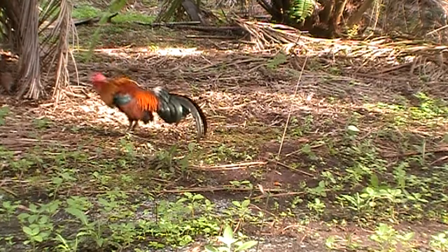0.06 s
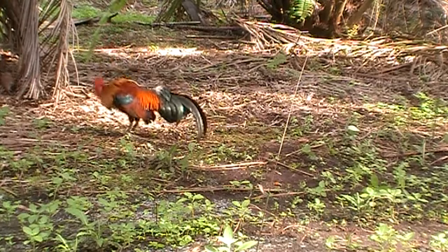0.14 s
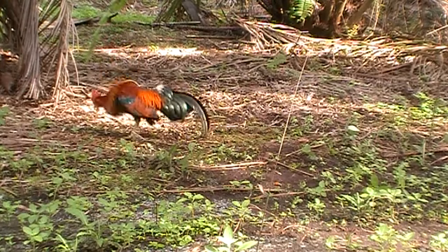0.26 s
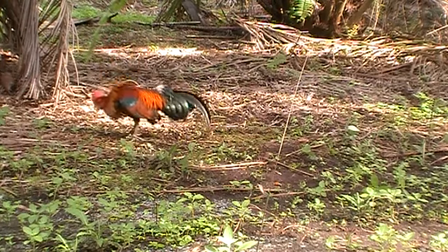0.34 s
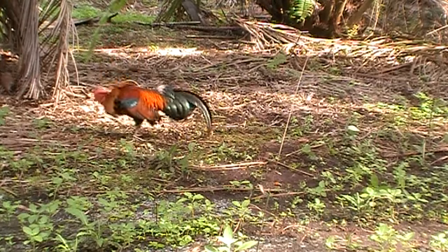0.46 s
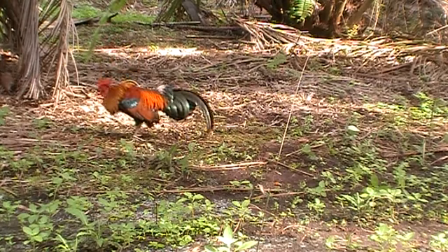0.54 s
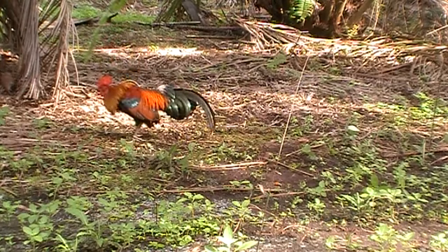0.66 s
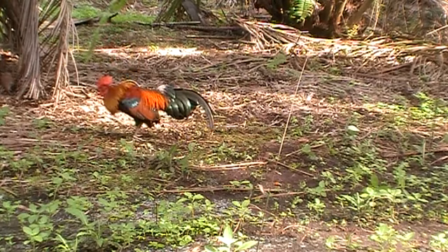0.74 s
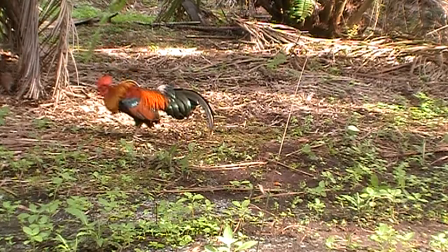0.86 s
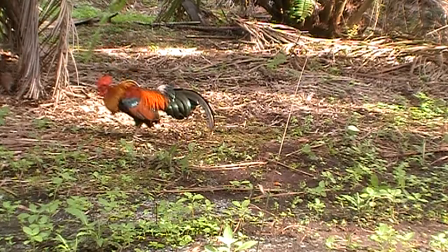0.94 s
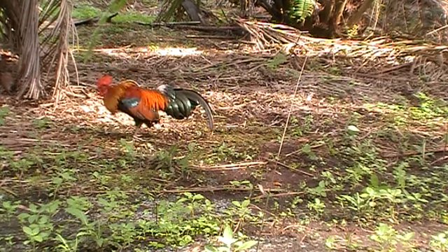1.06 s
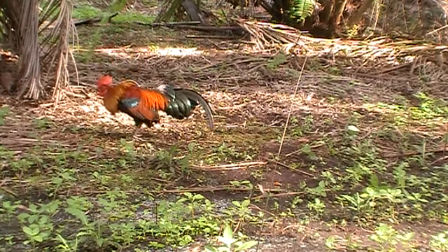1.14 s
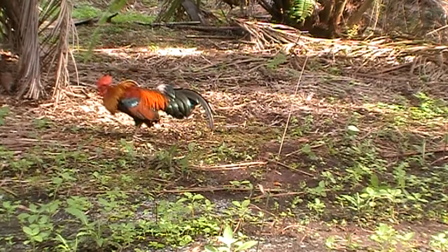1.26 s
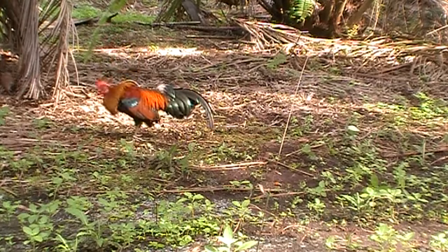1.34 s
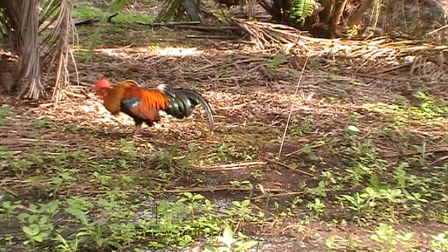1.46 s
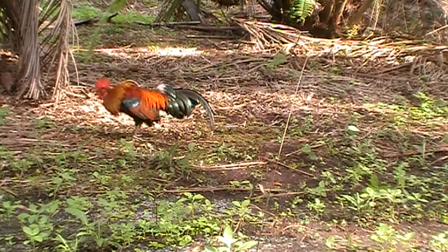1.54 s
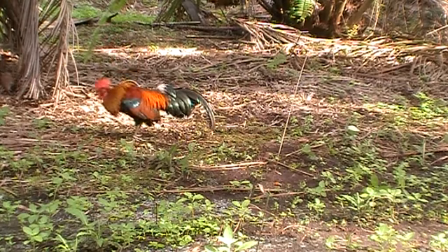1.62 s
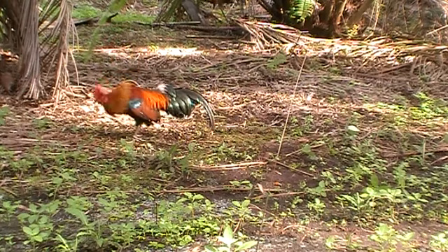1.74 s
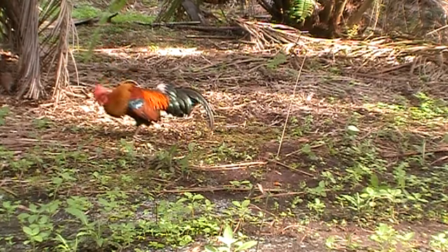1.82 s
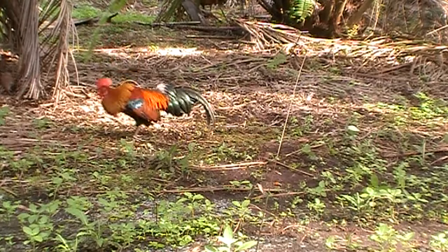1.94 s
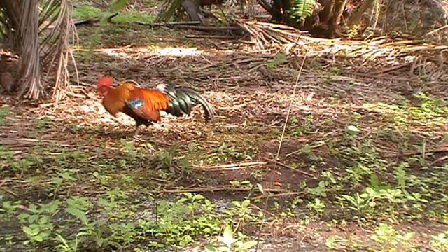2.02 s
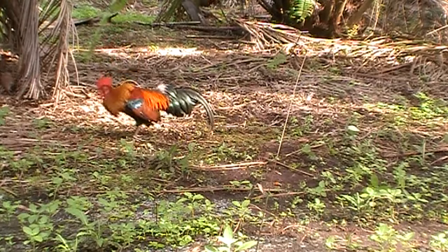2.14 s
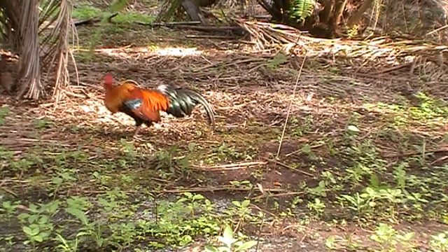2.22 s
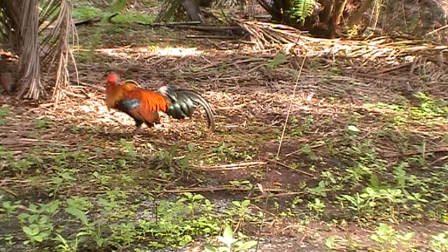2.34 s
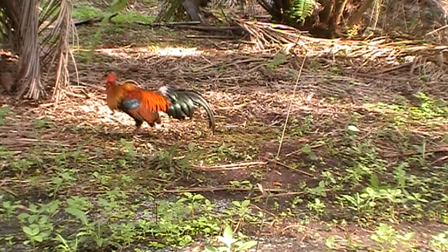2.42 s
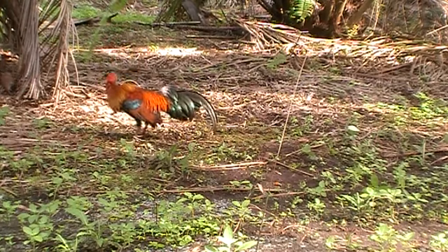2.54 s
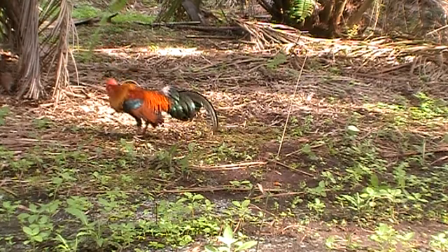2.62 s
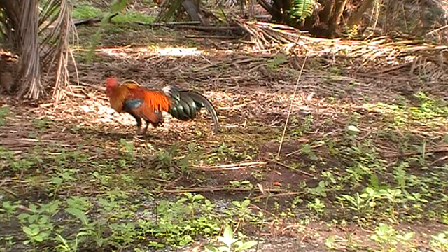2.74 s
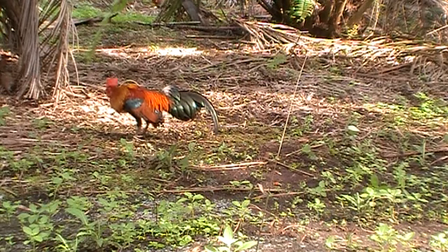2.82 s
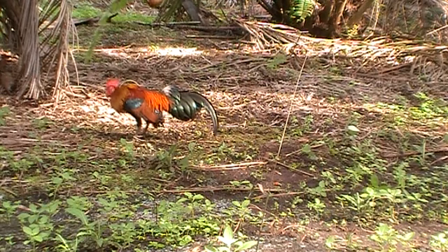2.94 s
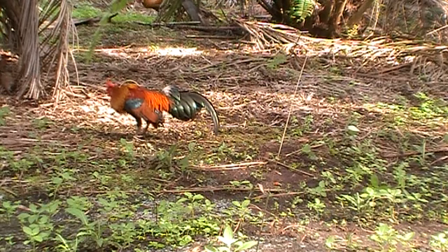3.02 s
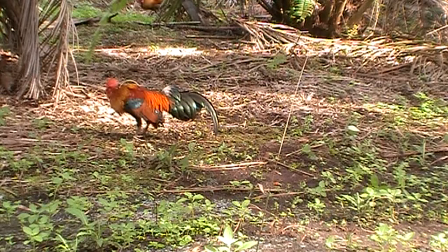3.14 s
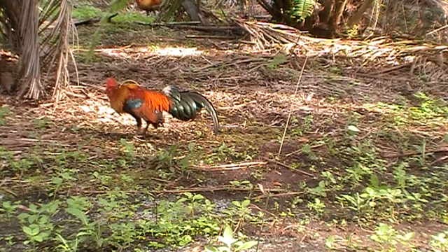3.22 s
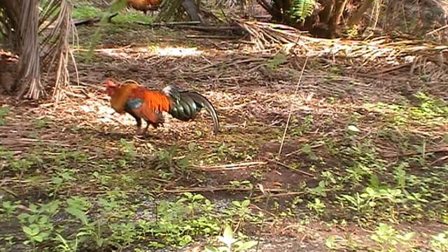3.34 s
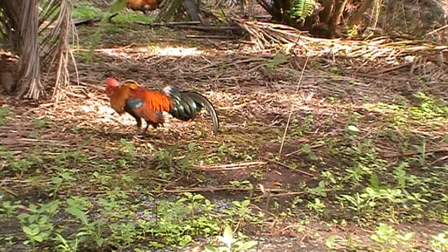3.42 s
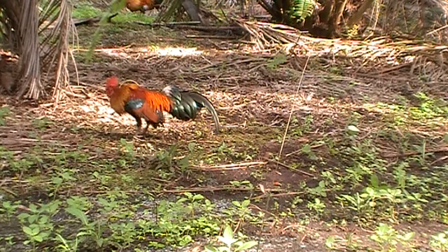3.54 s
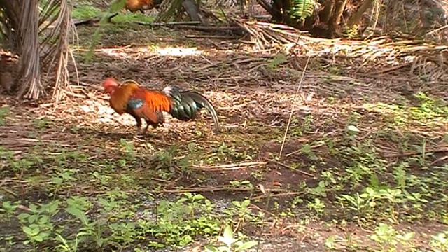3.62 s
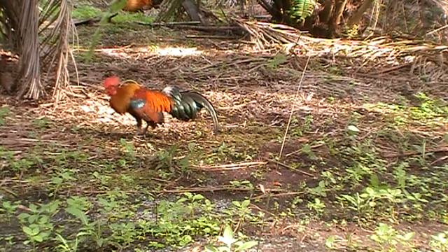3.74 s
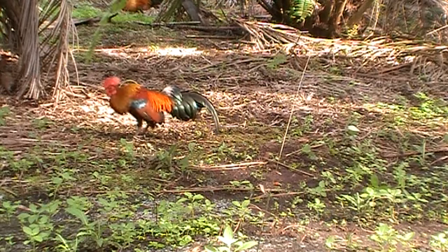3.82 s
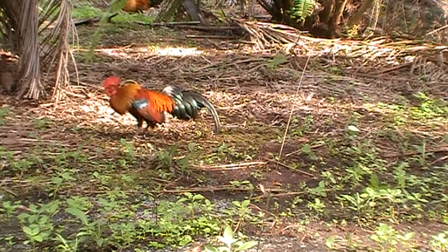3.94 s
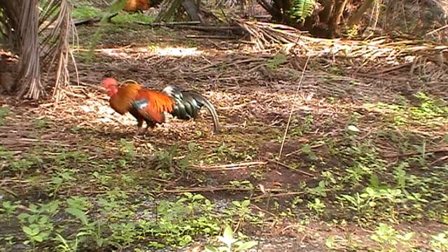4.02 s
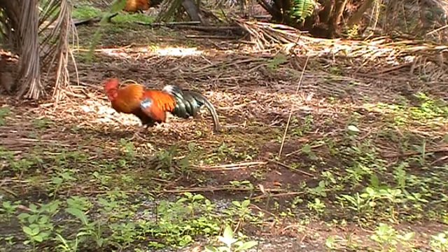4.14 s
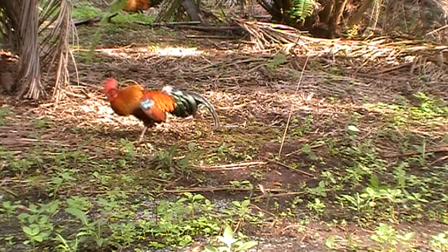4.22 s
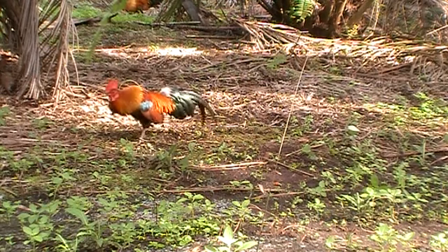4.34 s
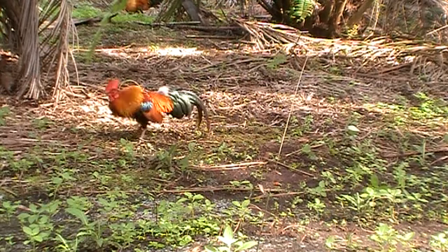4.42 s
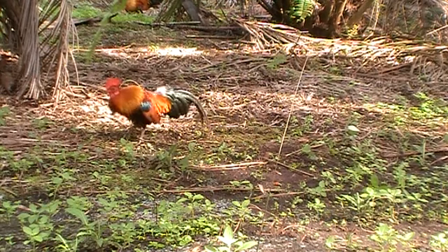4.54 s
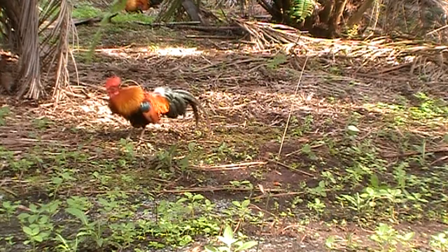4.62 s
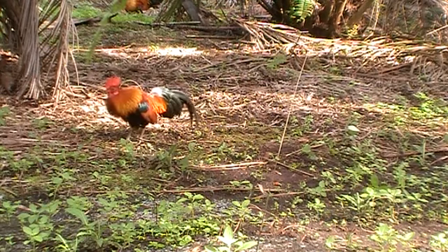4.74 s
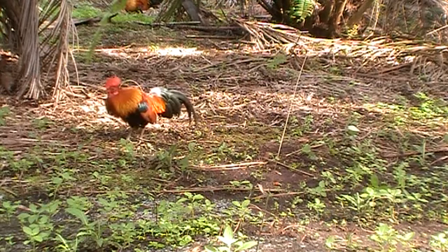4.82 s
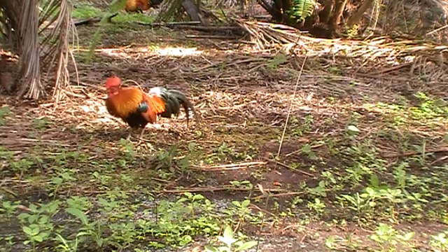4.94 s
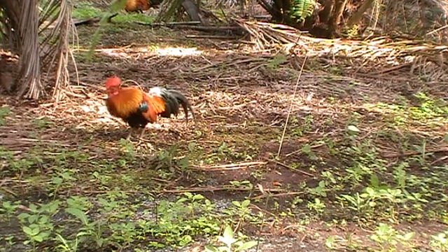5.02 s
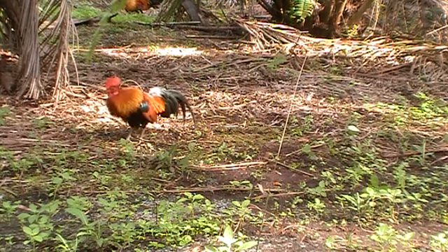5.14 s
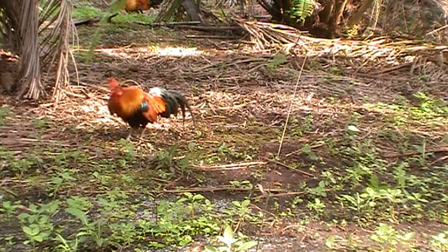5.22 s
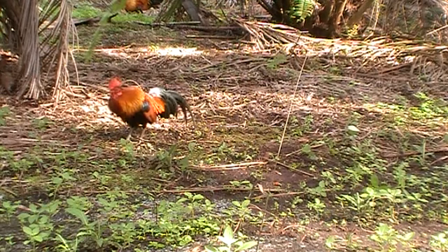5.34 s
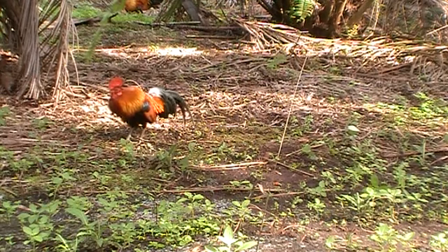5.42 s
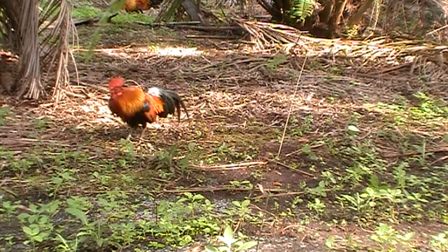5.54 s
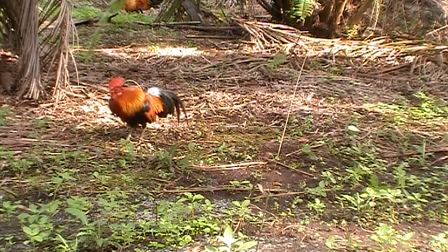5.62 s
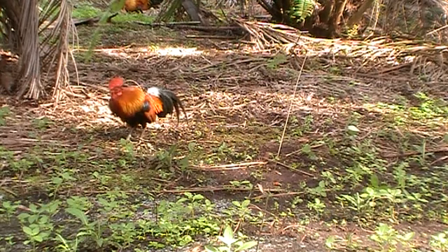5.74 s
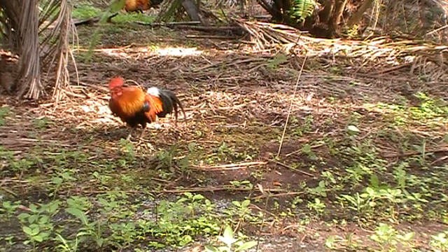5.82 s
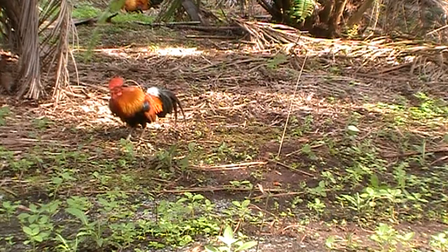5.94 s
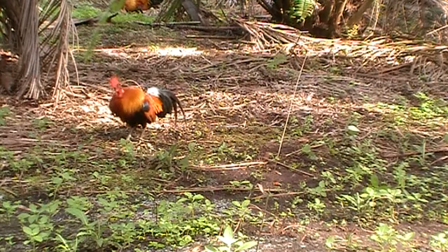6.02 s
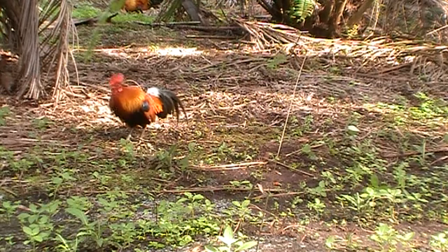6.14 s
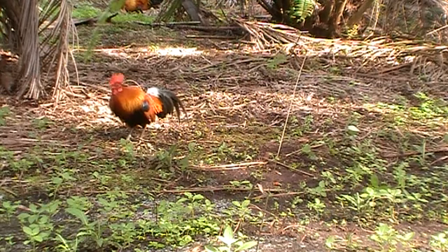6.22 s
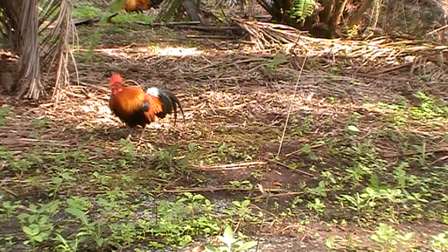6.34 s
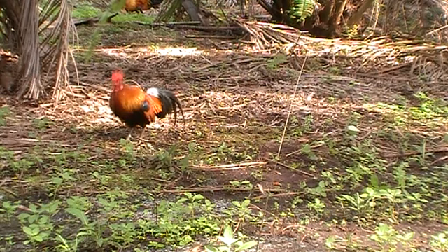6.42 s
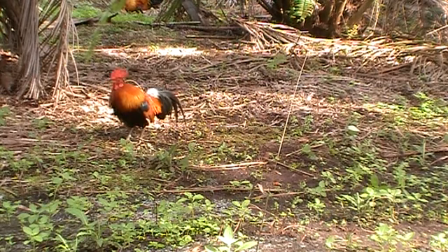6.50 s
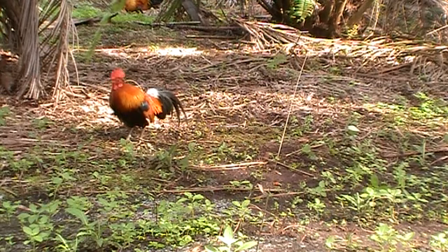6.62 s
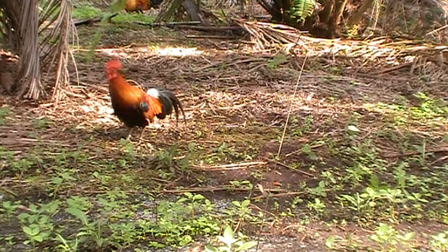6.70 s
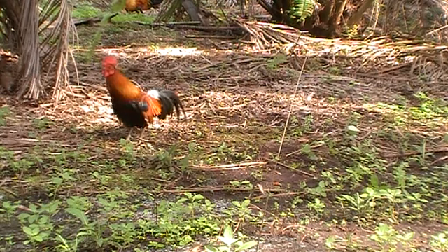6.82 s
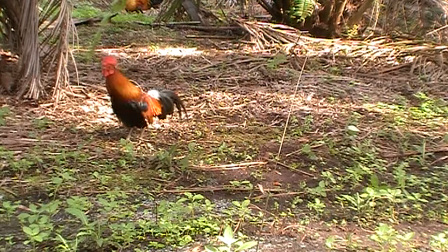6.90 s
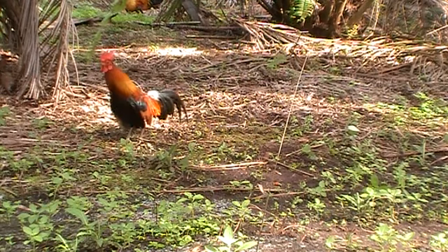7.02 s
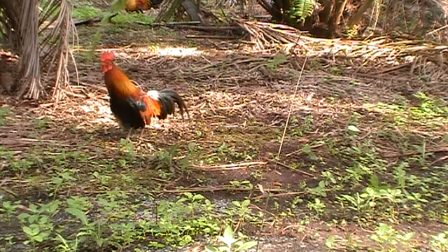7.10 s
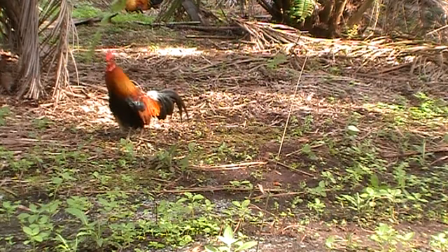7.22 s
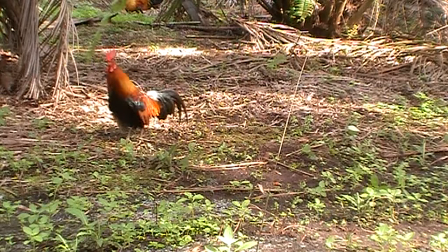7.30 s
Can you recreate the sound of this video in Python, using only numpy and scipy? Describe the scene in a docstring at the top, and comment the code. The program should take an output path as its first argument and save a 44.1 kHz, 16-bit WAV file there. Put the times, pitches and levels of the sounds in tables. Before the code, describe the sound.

A thin, high, rapidly pulsing cricket and katydid tone hangs over forest hush and faint low rumble. Distant fowl cackle and crow, and a dove repeats a three-note coo whose last note trills, then smooths and falls. Small twigs snap. A rooster mutters softly midway, then gives four abrupt, hoarse alarm clucks near the end, the first by far the loudest. Outdoor stereo pickup, with a short woodland echo.

```python
"""Crickets and katydids keep up a thin, high, pulsing tone over a low distant rumble and a forest hush: wing
strokes are gated tones or noise, the rumble and hush are shaped noise. Far fowl cackle and crow in wavering
notes; hoarse bird calls are sliding noise and twigs snap as tiny noise bursts. A dove repeats a three-note coo,
a near sine whose last note starts as a quickening trill and smooths out as it falls. A rooster mutters softly,
then gives four alarm clucks close by, each weaker than the last: pulses and hoarse air shaped by his throat."""
import sys
import numpy as np
from scipy import signal
from scipy.fft import rfft, irfft, next_fast_len
from scipy.io import wavfile
from scipy.ndimage import uniform_filter1d

SR = 44100
rng = np.random.default_rng(int(sys.argv[2]) if len(sys.argv) > 2 else 0)


def to_wav(s):
    """Save 16-bit WAV."""
    ch = np.atleast_2d(s).T  # columns
    pcm = np.round(np.clip(ch, -1, 1) * 32767)  # PCM
    wavfile.write(sys.argv[1], SR, pcm.astype(np.int16))


N = 325017
T = np.arange(N) / SR   # time in seconds

# How the rooster's throat passes sound with the beak wide open. Each row: frequency in Hz, gain in dB.
OPEN_BEAK = [(250, -43), (480, -25.5), (680, -17), (1000, -5), (1200, 2.5), (1340, 6), (1560, -2),
             (2000, -16), (2380, 1.5), (2720, -9.5), (3500, -19), (4300, -15), (6000, -26.5), (11000, -30),
             (15000, -38)]
# A near tree trunk sends the coo and the alarm clucks back after this delay.
TRUNK_ECHO_S = 0.039


def from_db(db):
    """Turn decibels into a gain."""
    return 10 ** (np.asarray(db) / 20)


def rms_one(x):
    """Scale a sound to an average (rms) level of 1."""
    return x / np.sqrt(np.mean(x ** 2) + 1e-20)


def in_time(rows, t=T):
    """Read the columns of a table at the times t; the first column is time in seconds."""
    s, *columns = np.transpose(rows)
    return [np.interp(t, s, c) for c in columns]


def coloured(x, points):
    """Shape a steady sound by (Hz, dB) points, falling steeply outside them; rms 1."""
    size = next_fast_len(x.shape[-1])
    hz, db = np.transpose(points)
    octave = np.log2(np.fft.rfftfreq(size, 1 / SR) + 1)
    knots = np.log2(hz)
    outside = np.abs(octave - np.clip(octave, knots[0], knots[-1]))
    gain = from_db(np.interp(octave, knots, db) - 90 * outside)   # 90 dB per octave outside
    return rms_one(irfft(rfft(x, size) * gain, size)[..., :x.shape[-1]])


def band(hz, width_hz):
    """(Hz, dB) points of one resonance."""
    edge = 1 + abs(width_hz) / hz / 2
    return [(hz / edge ** 2, -12), (hz / edge, -3), (hz, 0), (hz * edge, -3), (hz * edge ** 2, -12)]


def stereo_noise(points, likeness, size=N):
    """Coloured noise whose two ears are alike by the given amount (1 is identical, 0 unrelated)."""
    mid, side = coloured(rng.standard_normal((2, size)), points)
    likeness = np.clip(likeness, -1, 1)
    return rms_one(np.sqrt(1 + likeness) * mid + np.sqrt(1 - likeness) * np.array([side, -side]))


def drift(per_s, size=N):
    """Wander at random between per_s new values a second, with a spread of about 1."""
    knots = rng.standard_normal(int(size / SR * per_s) + 3)
    return np.interp(np.arange(size) / SR * per_s, np.arange(len(knots)), knots)


def turns(hz):
    """Count the cycles done at a changing rate."""
    return np.cumsum(hz) / SR


def pulses(cycles, sharpness):
    """One smooth pulse in the middle of each cycle."""
    return (np.sin(np.pi * cycles) ** 2) ** abs(sharpness)


def panned(x, left_db):
    """Make the left ear louder than the right by left_db."""
    return x * from_db([[left_db / 2], [-left_db / 2]])


def placed(x, left_db, lead_ms):
    """Place a point source: a level difference, and a right ear that hears it lead_ms later."""
    right = np.interp(T - lead_ms / 1000, T, x)
    return panned(np.array([x, right]), left_db)


def add(out, s, sound):
    """Mix a sound in from time s."""
    at = max(round(s * SR), 0)
    out[..., at:at + sound.shape[-1]] += sound[..., :max(N - at, 0)]


def forest(x, t60, dull_hz):
    """Trunks and leaves scatter sound into a dull tail, different in each ear, that drops 60 dB in t60 seconds."""
    t = T[:SR]
    tail = rng.standard_normal((2, SR)) * from_db(-60 * t / t60) * (1 - np.exp(-t / 0.0039))
    tail = tail / np.sqrt(np.sum(tail ** 2) / 2)
    dulling = signal.butter(1, min(dull_hz, SR / 3), fs=SR, output="sos")
    tail = signal.sosfilt(dulling, tail)
    return signal.fftconvolve(x[None], tail, axes=1)[:, :N]


def trunk_echo(x, db):
    """Add one echo, as a near trunk returns the sound."""
    return x + from_db(db) * np.interp(T - TRUNK_ECHO_S, T, x)


def ambience():
    """Distant rumble, alike in both ears only at the bottom, and the even hush of the forest."""
    # Colours of the deep rumble, upper rumble and hush. Each row: frequency in Hz, density in dB per Hz.
    deep_colour = [(13, -49), (22, -0.5), (32, -17), (59, 2.5), (125, -1), (160, -52), (280, -120)]
    upper_colour = [(115, -17), (135, -1.5), (200, -1), (240, -12.5), (330, -28.5)]
    hush_colour = [(200, 3), (400, 2), (1000, -6.5), (2000, -9), (3000, -9), (3900, -10), (4600, -1),
                   (5700, -1), (6200, 0.5), (8300, -0.5), (10000, 3.5), (11600, 4), (12400, -58),
                   (15000, -56)]
    deep = stereo_noise(deep_colour, likeness=0.81) * from_db(-56.33)
    upper = stereo_noise(upper_colour, likeness=0.056) * from_db(-58.27)
    hush = stereo_noise(hush_colour, likeness=0.011) * from_db(-50.5)
    return panned(deep, left_db=-4.0) + panned(upper, left_db=-3.0) + panned(hush, left_db=0.4)


def far_din():
    """Fowl still farther off blur together into a soft wash of noise."""
    # The din's level. Each row: time in seconds, level in dB before the trim.
    din_levels = [(0.0, -64), (4.03, -55.5), (4.16, -53), (4.79, -55.5), (4.94, -55.5), (6.7, -54.5)]
    # The din's colour. Each row: frequency in Hz, density in dB per Hz.
    din_colour = [(800, 5.5), (1100, 2.5), (1500, -2), (2000, -6), (2400, -3), (3200, -14)]
    trim_db = -3
    wash = panned(stereo_noise(din_colour, likeness=0.024), left_db=-2.5)
    return wash * from_db(in_time(din_levels)[0] + trim_db)


def bout(stop, hold, swell_db_per_s, release_db_per_s):
    """Gain of an insect's bout: it swells, holds at 1 and dies away after the stop."""
    swell_db = -swell_db_per_s * np.maximum(stop - hold - T, 0)
    release_db = -release_db_per_s * np.maximum(T - stop, 0)
    return from_db(swell_db + release_db)


def tree_cricket():
    """A faint, narrow band of noise, pulsed by wing strokes, comes and goes as a trill."""
    # The bouts of trilling. Each row: stop in seconds, hold in seconds.
    trill_bouts = [(.55, .6), (3.08, 0.89), (4.588, 0.84), (6.799, 0.82)]
    strokes_per_s = 65.5 + 1.48 * drift(2.06)
    strokes = rms_one(1.0 + pulses(turns(strokes_per_s), sharpness=0.65))
    singing = sum(bout(s, hold, swell_db_per_s=52, release_db_per_s=71) for s, hold in trill_bouts)
    tone = panned(stereo_noise(band(4727, 87), likeness=0.011), left_db=-1.5)
    return tone * strokes * from_db(-61) * singing


def wing_tone(strokes, per_s, hz):
    """Every stroke sets the wing ringing afresh, so the tone splits into lines one stroke rate apart."""
    return np.sqrt(2) * np.sin(2 * np.pi * hz * (strokes % 1) / per_s)


def katydids():
    """One buzzes in bouts of short scrapes; in the other each wing stroke slides down in pitch."""
    # When each bout of the buzzing and of the sliding katydid stops. Each entry: stop in seconds.
    buzz_stops = [.39, 1.16, 1.865, 2.545, 3.235, 3.97, 4.69, 5.41, 6.12, 6.8]
    zip_stops = [.3, 1.35, 2.37, 3.412, 4.47, 5.48, 6.85]
    buzz_rate, zip_rate = 137.3, 91.4   # wing strokes per second
    buzz_db, buzz_rest_db = -50.5, -59   # in a bout; between bouts
    zip_db, zip_rest_db = -56.5, -67

    scrape = turns(buzz_rate + 1.0 * drift(4.5))
    noise = stereo_noise(band(10780, 650), likeness=.9)
    ringing = .66 * wing_tone(scrape, buzz_rate, hz=10790) + .73 * noise
    gate = rms_one(.1 + pulses(scrape, sharpness=3.5))
    buzzing = sum(bout(s, hold=0.3, swell_db_per_s=58, release_db_per_s=700) for s in buzz_stops)
    buzz = ringing * gate * np.hypot(from_db(buzz_db) * buzzing, from_db(buzz_rest_db))

    stroke = turns(zip_rate + 0.4 * drift(4.9))
    slide_hz = 9250 - 1700 * (stroke % 1 - .5) + 260 * drift(3000)
    zip_bouts = [bout(s, hold=0.24, swell_db_per_s=22, release_db_per_s=170) for s in zip_stops]
    zipping = np.max(zip_bouts, axis=0)
    zip_tone = rms_one(np.sin(2 * np.pi * turns(slide_hz)) * pulses(stroke, sharpness=0.24))
    zips = zip_tone * np.hypot(from_db(zip_db) * zipping, from_db(zip_rest_db))
    return panned(buzz, left_db=6.0) + panned(zips, left_db=-0.5)


def bush_cricket():
    """Each rattle is a run of crisp wing strokes on one wavering tone, swelling to a sudden stop."""
    # The rattles. Each row: stop in seconds, level in dB before the trim.
    rattles = [(.26, -54), (0.989, -51), (2.16, -49.5), (2.858, -50), (3.632, -48.5), (4.92, -55),
               (5.52, -49.5), (6.37, -50), (7.08, -47)]
    wing_hz, strokes_per_s, trim_db = 5340, 94, -3
    strokes = pulses(turns(strokes_per_s * (1 + .04 * drift(40))), sharpness=4)
    tone = rms_one(np.sin(2 * np.pi * turns(wing_hz + 70 * drift(500))) * strokes)
    song = tone * sum(from_db(db + trim_db) * bout(s, hold=0.063, swell_db_per_s=174, release_db_per_s=700)
                      for s, db in rattles)
    tail = from_db(-9) * forest(song, t60=0.071, dull_hz=7000)
    return placed(song, left_db=6.0, lead_ms=0.077) + tail


def cricket():
    """About twenty chirps a second, each of four sliding wing strokes, the middle ones strongest."""
    # The chirps slow down, then quicken. Each row: time in seconds, chirps per second.
    chirp_rate = [(0, 20.3), (1, 18.9), (4, 19.4), (7, 21.45)]
    # Colours of the wing's main tone and its overtone. Each row: frequency in Hz, gain in dB.
    song_colour = [(6150, -27), (6300, -21), (6480, -4), (6570, -3.5), (6680, 4.5), (6720, 8.5), (6840, 6),
                   (6915, 7.5), (6985, 2), (7090, 1.5), (7250, 1), (7750, -8), (8200, -17)]
    overtone_colour = [(12600, -10), (13300, -0.5), (13700, -7), (14300, 5), (15200, -26)]
    chirps = turns(in_time(chirp_rate)[0]) + .1   # a tenth of a chirp is already sung at the start
    stroke = 4 * chirps + .03 * drift(70)
    effort = 0.63 + pulses(chirps, sharpness=2.1)
    # each wing stroke slides down through the wing's resonances
    hz = 6990 - 1980 * (stroke % 1 - .5) + 130 * drift(300)
    direct = coloured(np.sin(2 * np.pi * turns(hz)) * pulses(stroke, sharpness=.6) * effort, song_colour)
    # leaves scatter the song, and others sing farther off
    scattered = from_db(-1) * rms_one(forest(direct, t60=.045, dull_hz=9000))
    chorus = from_db(-3.5) * stereo_noise(song_colour, likeness=0)
    song = rms_one(placed(direct, left_db=0, lead_ms=.055) + scattered + chorus)
    overtone = panned(stereo_noise(overtone_colour, likeness=-0.068), left_db=1.4) * from_db(-53)
    return panned(song, left_db=-4.0) * from_db(-42) + overtone * rms_one(3.8 + effort)


def far_birds():
    """Short hoarse calls: bands of noise that slide downwards, blurred by the trees."""
    # The calls. Each row: middle in seconds, length in seconds, start pitch in Hz, end pitch in Hz,
    # width of the noise in Hz, level in dB.
    calls = [(.565, .075, 2160, 1600, 603, -50), (1.665, 0.063, 3350, 2250, 250, -65),
             (3.46, 0.073, 2260, 1560, 450, -60.5), (5.415, .14, 2580, 2100, 900, -57.5),
             (5.874, .09, 2340, 1603, 650, -54), (6.546, 0.089, 2410, 1537, 600, -54.5)]
    out = np.zeros((2, N))
    for s, length, start_hz, end_hz, width, db in calls:
        u = np.linspace(0, 1, int(length * SR))
        hoarse = signal.hilbert(stereo_noise(band(start_hz, width), likeness=0.13, size=len(u)))
        call = np.real(hoarse * np.exp(2j * np.pi * turns((end_hz - start_hz) * u)))   # shift all pitches
        flicker = from_db(db + 5.1 * drift(48, size=len(u)))
        add(out, s - length / 2, flicker * pulses(u, sharpness=0.34) * call)
    return out + from_db(-1) * forest(out[0], t60=0.31, dull_hz=4000)


def twigs():
    """Dry leaves and twigs snap underfoot: tiny bursts of noise that die at once; two more such bursts give the
    rooster's first mutters a crisp edge."""
    # The snaps, and the crisp edges of the mutters at 4.006 s and 4.171 s. Each row: start in seconds, centre
    # frequency in Hz, starting level in dB.
    snaps = [(2.318, 2670, -55), (3.585, 10000, -47), (3.595, 1400, -44.5), (3.703, 9500, -45),
             (4.006, 2520, -56), (4.052, 9920, -39), (4.171, 2890, -47), (5.984, 1495, -52)]
    out, t = np.zeros((2, N)), T[:SR // 20]
    for s, hz, db in snaps:
        noise = stereo_noise(band(hz, hz / 2), likeness=0.48, size=len(t))
        add(out, s, from_db(db - 60 * t / 0.068) * noise)
    return out


def far_note(length, hz, arch, fall, rough, lift_db):
    """An arched, wavering note of which distance leaves mainly the second harmonic."""
    # What is left of the harmonics, from the fundamental up. Each entry: level in dB, before lift_db
    # is added from the third on.
    harmonic_levels = [-27, 0, -15, -13, -28]
    u = np.linspace(0, 1, int(length * SR))
    waver = rough * (.022 * drift(35, size=SR) + .035 * drift(400, size=SR))[:len(u)]
    pitch = hz * (1 - arch * (2 * u - 1) ** 2 - fall * (u - .5)) * (1 + waver)
    phase = 2 * np.pi * turns(pitch)
    note = sum(from_db(level + lift_db * (k > 2)) * np.sin(k * phase)
               for k, level in enumerate(harmonic_levels, 1))
    flicker = from_db(3 * drift(40, size=SR)[:len(u)])
    return rms_one(note) * flicker * pulses(u, sharpness=.2)


def far_fowl():
    """Short clear cackles that fall in pitch, and hoarser crowing from deeper among the trees."""
    # The cackles. Each row: start in seconds, level in dB.
    cackle_rows = [(0.181, -58.5), (0.262, -54), (.355, -60), (.472, -64), (1.173, -59), (1.252, -54),
                   (1.349, -60), (1.463, -63), (2.273, -53), (2.369, -61), (5.707, -48), (6.751, -51)]
    # Drawn-out crowing notes. Each row: start in seconds, length in seconds, pitch in Hz, arch as a share
    # of the pitch, level in dB, roughness (scales the waver), lift of the overtones in dB.
    crow_rows = [(.38, 0.19, 589, 0.087, -65, 0.9, 3), (.62, 0.15, 607, 0.096, -63, 0.68, -3),
                 (.73, 0.16, 547, 0.062, -64, 1, 2), (0.989, 0.072, 610, 0.14, -64, 0.27, -8),
                 (3.221, .33, 600, 0.098, -63.5, 1, 0), (3.454, 0.33, 510.6, .03, -61, 1.23, 4),
                 (4.324, 0.24, 469, 0.011, -59.5, .35, 12), (4.545, 0.39, 462, 0.019, -51, .7, 5),
                 (4.934, 0.128, 517, 0.069, -54.5, 1.03, 4), (5.082, 0.135, 507, 0.071, -57.5, 0.97, -2),
                 (5.198, .41, 503, 0.082, -53.5, 0.72, 4), (5.246, 0.4, 454, 0.029, -55, 1.01, 3),
                 (6.171, .12, 617, 0.046, -66, .5, -4)]
    cackles, crows = np.zeros((2, N))
    for s, db in cackle_rows:
        note = far_note(0.034, 494.4, arch=0, fall=0.14, rough=0.24, lift_db=-2)
        add(cackles, s, from_db(db) * note)
    for s, length, hz, arch, db, rough, lift_db in crow_rows:
        add(crows, s, from_db(db) * far_note(length, hz, arch, 0.0225, rough, lift_db))
    direct = placed(cackles + crows, left_db=-5.5, lead_ms=0.2)
    return direct + from_db(-1) * forest(crows + from_db(-7) * cackles, t60=.5, dull_hz=3050)


def coo_note(top_s, rise, fall, start_hz, top_hz, end_hz, db, trill, smooth_s):
    """Times, pitch, gain and trill depth of one note: two straight glides joined by a rounded top."""
    rounding_s, edge_s, swell_s, trill_fade_s = 0.0261, 0.003, 0.076, 0.08
    droop_hz, droop_s = 60, .022   # the pitch sinks as a note runs out
    crop_hz, loss_db_per_hz = 587.4, 0.27   # a coo fades as its pitch falls below the crop's resonance
    t = np.arange(top_s - rise, top_s + fall, 1 / SR)
    bend = lambda s: np.hypot(s, rounding_s) - rounding_s
    slope = np.where(t < top_s, (top_hz - start_hz) / bend(rise), (top_hz - end_hz) / bend(fall))
    hz = top_hz - bend(t - top_s) * slope
    hz = hz - droop_hz * np.exp((t - t[-1]) / droop_s)
    edges = np.minimum(np.minimum(t - t[0], t[-1] - t) / edge_s, 1)
    swell = np.minimum(0.54 + (t - t[0]) / swell_s, 1)
    gain = edges * swell * from_db(db - loss_db_per_hz * np.maximum(crop_hz - hz, 0))
    depth = np.clip(trill, 0, 1) * np.clip((smooth_s - t) / trill_fade_s, 0, 1)
    return t, hz, gain, depth


def dove():
    """A near sine from the swollen crop; where it trills, it is chopped into pulses that each slide upwards."""
    # How much later each repeat of the coo comes. Each entry: delay in seconds.
    delays_s = [0, 2.109, 4.226]
    # The trill quickens as the last note starts. Each row: time in seconds, pulses per second.
    trill_rate = [(2.046, 28.3), (2.5, 89.6)]
    # The three notes, each an arch of pitch. Each row: top in seconds, rise in seconds, fall in seconds,
    # start pitch in Hz, top pitch in Hz, end pitch in Hz before the droop, level in dB, trill depth 0-1,
    # time in seconds when the trill has smoothed out, octave level in dB at 560 Hz and above.
    notes = [(1.54, 0.06, 0.044, 466, 601.5, 510, -42, 0.05, 1.6, -16),
             (1.866, 0.17, 0.0326, 478, 651, 560, -41.5, .7, 1.89, -30),
             (2.122, .069, .41, 620, 750, 508, -38, 0.95, 2.37, -32)]
    out, trill_start = np.zeros(N), trill_rate[0][0]
    beats = turns(np.where(T < trill_start, 72, in_time(trill_rate)[0]))
    beats = beats - np.interp(trill_start, T, beats)
    for *note, octave_db in notes:
        t, hz, gain, depth = coo_note(*note)
        cycles = np.interp(t, T, beats)
        for delay in delays_s:
            slide = .09 * depth * np.tanh(6 * (cycles % 1 - .42))
            waver = 0.024 * drift(300, size=SR)[:len(t)]
            phase = 2 * np.pi * turns(hz * (1 + slide + waver))
            gate = 1 - .9 * depth + depth * pulses(cycles, sharpness=1.2)
            gate = gate * from_db(.7 * drift(260, size=SR)[:len(t)])
            # the octave grows where the pitch drops below the crop's resonance
            octave = from_db(np.interp(hz, [450, 505, 560], [10, -5, octave_db])) * np.sin(2 * phase)
            add(out, t[0] + delay, np.sqrt(2) * gain * gate * (np.sin(phase) + octave))
    out = trunk_echo(out, db=-14.5)
    return placed(out, left_db=-4.3, lead_ms=.13) + from_db(-18) * forest(out, t60=.4, dull_hz=2000)


def through_throat(x, points):
    """Shape by (Hz, dB) points so that each resonance rings after its pulse (minimum phase); rms 1."""
    hz, db = np.transpose(points)
    log_gain = np.log(from_db(np.interp(np.fft.rfftfreq(len(x), 1 / SR), hz, db)))
    cepstrum = irfft(log_gain, len(x))
    causal = 2 * cepstrum * (np.arange(len(x)) < len(x) // 2)
    return rms_one(irfft(rfft(x) * np.exp(rfft(causal)), len(x)))


def voice_pulses(phase):
    """The membranes slap unevenly, so the 24 harmonics do not line up in one spike."""
    order = np.arange(1, 25)[:, None]
    return np.cos(order * phase + rng.uniform(0, 2 * np.pi, order.shape)).sum(axis=0)


def hoarse_air(phase):
    """Breath noise that swells and sinks with each cycle of the voice."""
    return rng.standard_normal(len(phase)) * (1 + .5 * np.cos(phase))


def soft_clucks():
    """Each mutter is a burst of uneven pulses and rasp through the throat; its pitch sags as the push dies."""
    # The mutters. Each row: start in seconds, hold in seconds, level in dB, beak opening 0-1.
    mutters = [(3.996, 0.0046, -42, 0.37), (4.16, 0.005, -38, 0.3), (4.307, 0.0018, -38.5, 0.01),
               (4.45, .001, -42, 0), (4.573, 0.0078, -36, 0.01), (4.664, 0.0075, -35.5, 0.08),
               (4.791, .014, -37, 0.01), (4.817, 0.029, -36, 0.08), (4.867, 0.016, -35, 0.05),
               (4.942, 0.0041, -33, 0.01)]
    # The throat with the beak closed. Each row: frequency in Hz, gain in dB.
    closed_beak = [(130, -27), (250, -4.5), (370, 1.5), (500, 7), (680, 0.5), (900, -4.5), (1300, -12.5),
                   (1800, -23), (3500, -40), (7000, -69)]
    rise_s, t60_s, rough = 0.0063, 0.057, 0.89
    closed_hz, open_drop_hz = 376.6, 206   # pitch with the beak closed; its drop with the beak fully open
    out, t = np.zeros(N), T[:SR // 8]
    for s, hold, db, opening in mutters:
        hz = closed_hz - open_drop_hz * opening
        pitch = hz * (1 - 0.14 * np.tanh((t - rise_s) / 0.009)) * (1 + 0.195 * drift(918, size=len(t)))
        phase = 2 * np.pi * turns(pitch)
        source = rms_one(voice_pulses(phase)) + 2 * rough * rms_one(hoarse_air(phase))
        opening = np.clip(opening, 0, 1)
        voice = opening * through_throat(source, OPEN_BEAK)
        voice = voice + (1 - opening) * through_throat(source, closed_beak)
        voice = voice / np.sqrt(uniform_filter1d(voice ** 2, size=200) + 1e-9)   # even out the level
        push_db = -22 * np.maximum(1 - t / rise_s, 0) - 60 * np.maximum(t - rise_s - hold, 0) / t60_s
        add(out, s, voice * from_db(db + push_db))
    return out


def alarm_clucks():
    """A cluck starts as a hoarse catch; the voice then breaks in on a short arch of pitch over the rasp."""
    # The alarm clucks, beak wide open. Each row: start in seconds, length of the hoarse catch in seconds,
    # hold in seconds, pitch in Hz, voice level in dB, rasp level in dB, throat tuning as a ratio,
    # time in seconds for the voice to drop 60 dB.
    alarms = [(6.783, .0145, .001, 662, -9, -19.5, 1, .045),
              (6.9935, .0095, .001, 652, -10.5, -22.5, .97, .066),
              (7.176, .008, .016, 452, -22.5, -29.5, .95, .055), (7.355, .003, .004, 665, -28, -36, 1, .1)]
    # Colour of the hoarse air. Each row: frequency in Hz, gain in dB.
    rasp_colour = [(250, -24.5), (650, -7), (1000, -7), (1350, 3.5), (1850, -1), (2380, 2), (2750, -4.5),
                   (3300, -6), (3700, -10.5), (4400, -4.5), (6000, -17), (11000, -14), (14500, -17),
                   (15500, -40)]
    rasp_catch_db, rasp_rise_s, rasp_t60_s = -4, 0.0023, 0.13
    voice_swell_db_per_s, jitter = 2000, 0.022
    arch_share, arch_s = 0.0634, 0.00284   # the pitch peaks with the push: rise, and half width without hold
    out, t = np.zeros(N), T[:SR // 6]
    for s, catch, hold, hz, voice_db, rasp_db, throat, t60 in alarms:
        early, late = np.maximum(catch - t, 0), np.maximum(t - catch - hold, 0)
        arch = arch_share * np.exp(-((t - catch - hold / 2) / (arch_s + hold / 2)) ** 2)
        phase = 2 * np.pi * turns(hz * (1 + arch + jitter * drift(960, size=len(t))))
        voice = through_throat(voice_pulses(phase), [(f * throat, db) for f, db in OPEN_BEAK])
        rasp = through_throat(hoarse_air(phase), [(f * throat, db) for f, db in rasp_colour])
        rasp = rasp * from_db(2.0 * drift(443, size=len(t)))
        voice_gain = from_db(voice_db - voice_swell_db_per_s * early - 60 * late / t60)
        rasp_gain = from_db(rasp_db + rasp_catch_db * early / catch - 60 * late / rasp_t60_s)
        add(out, s, (voice * voice_gain + rasp * rasp_gain) * np.minimum(t / rasp_rise_s, 1))
    return trunk_echo(out, db=-34)


def rooster():
    """Clucks ring on among the trees; the alarms' body leans right, their treble left, the very top is even."""
    alarm = alarm_clucks()
    low = signal.sosfiltfilt(signal.butter(3, 1850, fs=SR, output="sos"), alarm)
    top = signal.sosfiltfilt(signal.butter(3, 6500, "high", fs=SR, output="sos"), alarm)
    treble = alarm - low - top
    direct = placed(low, left_db=-5.0, lead_ms=0.013) + placed(treble, left_db=2.5, lead_ms=0.056) + top
    mutter = soft_clucks()
    tail = from_db(-16.5) * forest(alarm, t60=0.57, dull_hz=4000)
    tail = tail + from_db(-6) * forest(treble, t60=.2, dull_hz=4500)
    tail = tail + from_db(-11) * forest(mutter, t60=0.31, dull_hz=2960)
    return direct + placed(mutter, left_db=-4.0, lead_ms=0.13) + tail


def scene():
    """Mix the forest, the insects and the birds."""
    insects = tree_cricket() + katydids() + bush_cricket() + cricket()
    birds = far_din() + far_birds() + far_fowl() + dove() + rooster()
    return ambience() + insects + twigs() + birds


def record(dry):
    """Cut the top steeply above 15400 Hz."""
    return signal.sosfilt(signal.ellip(10, .1, 80, 15400, fs=SR, output="sos"), dry)


dry = scene()
out = record(dry)
to_wav(out)
```